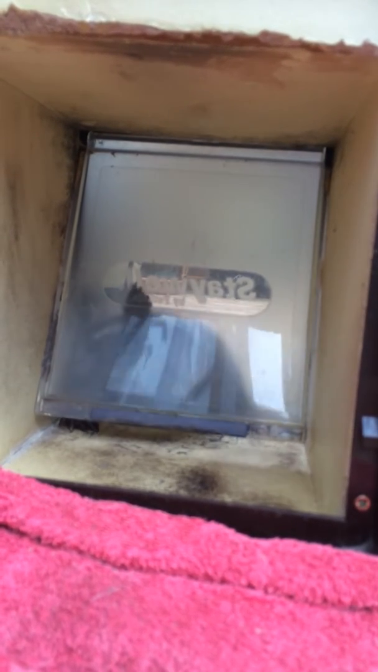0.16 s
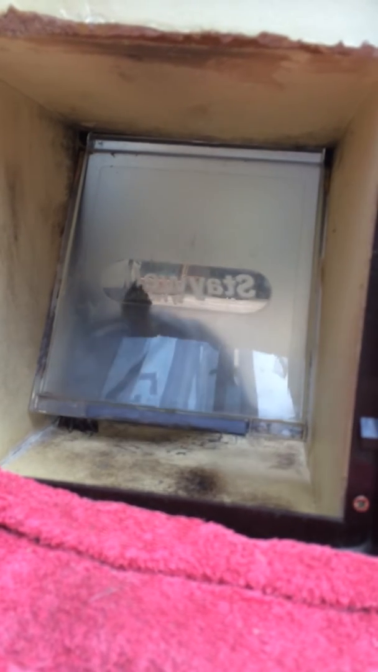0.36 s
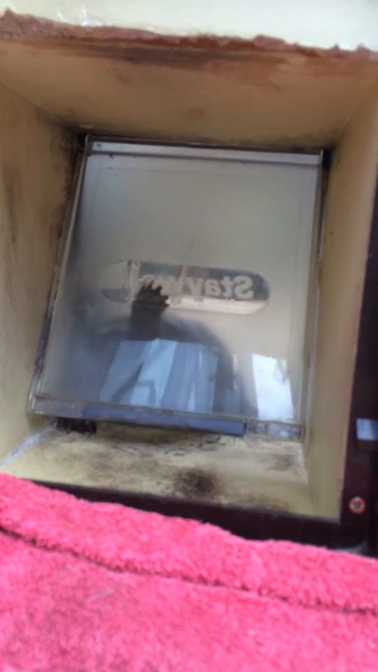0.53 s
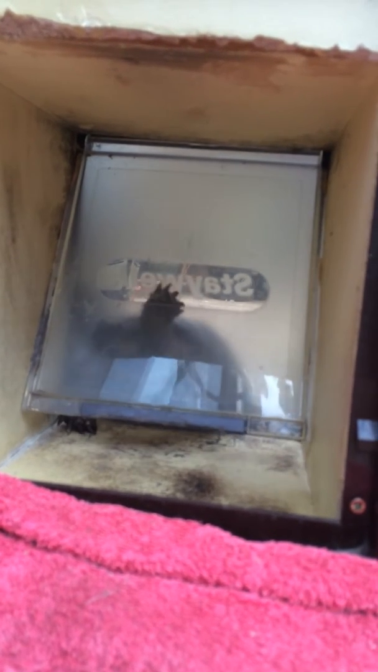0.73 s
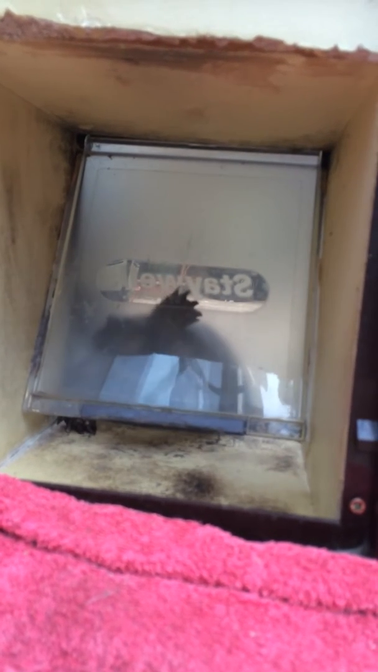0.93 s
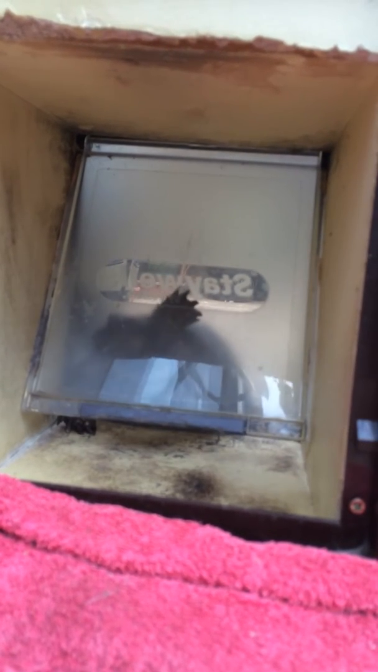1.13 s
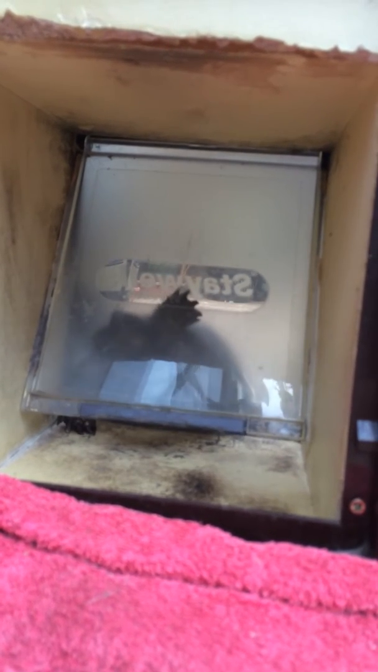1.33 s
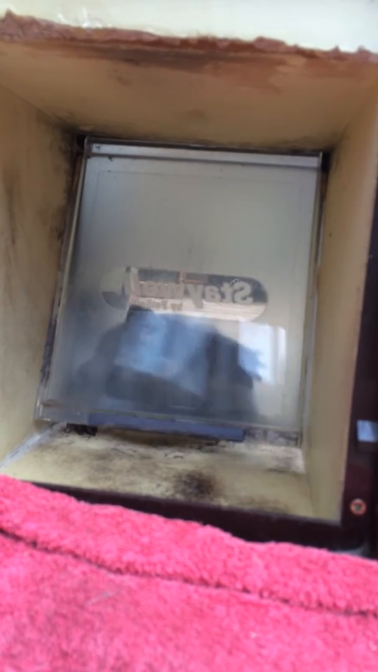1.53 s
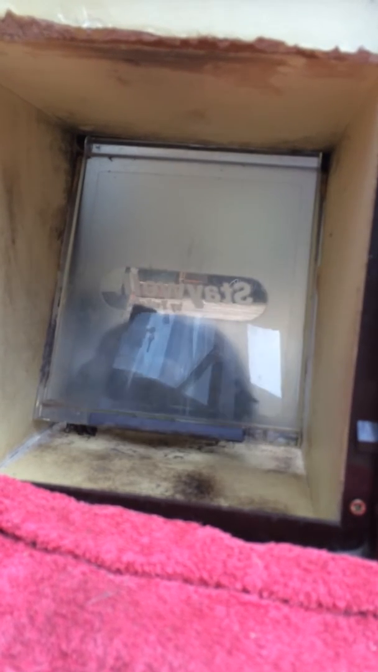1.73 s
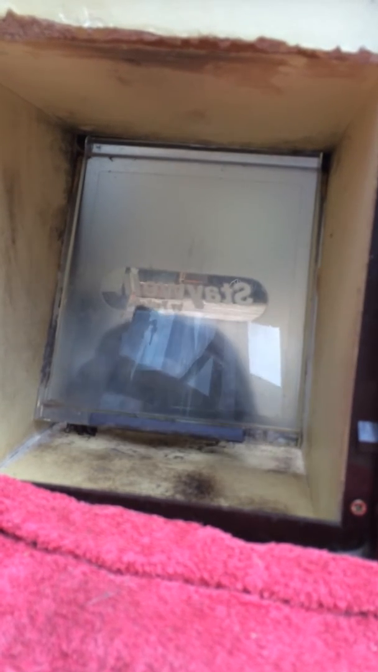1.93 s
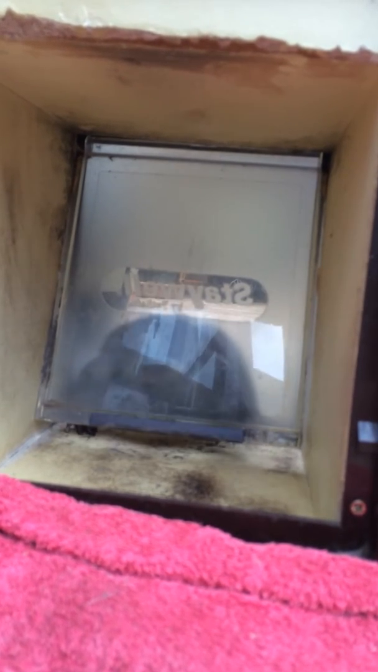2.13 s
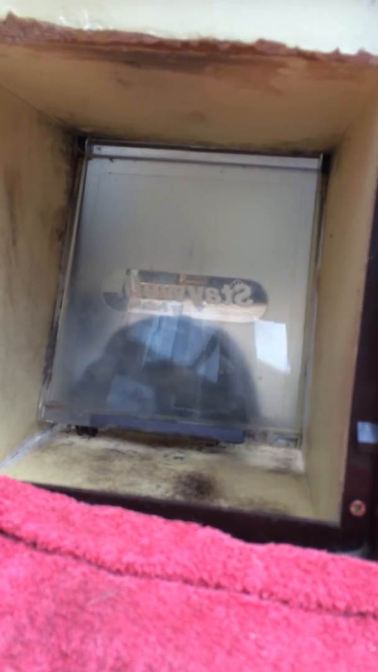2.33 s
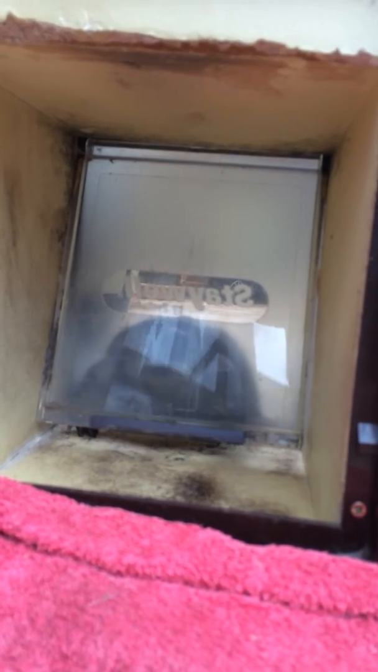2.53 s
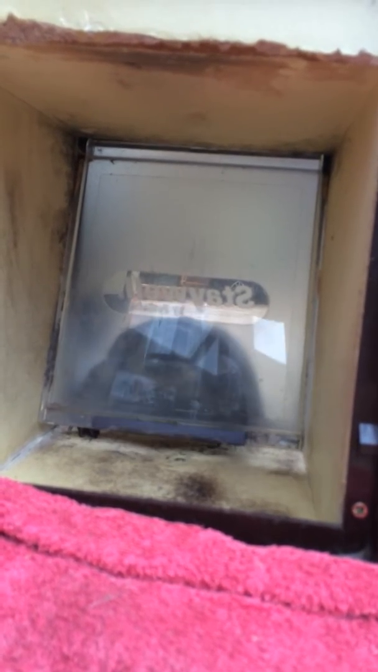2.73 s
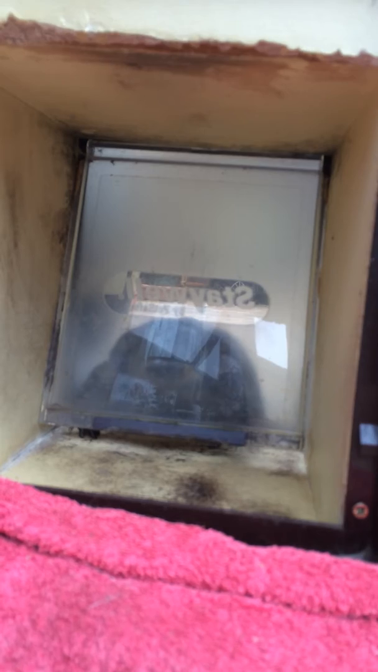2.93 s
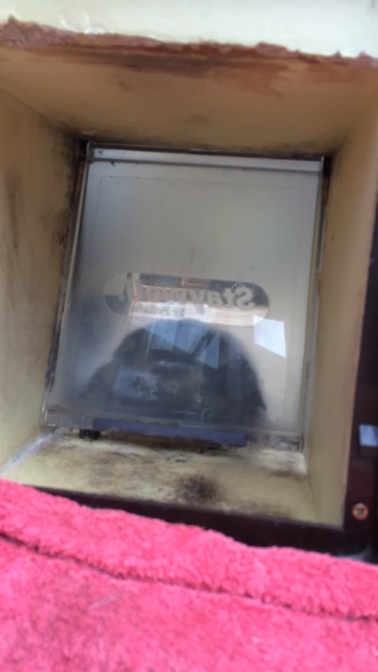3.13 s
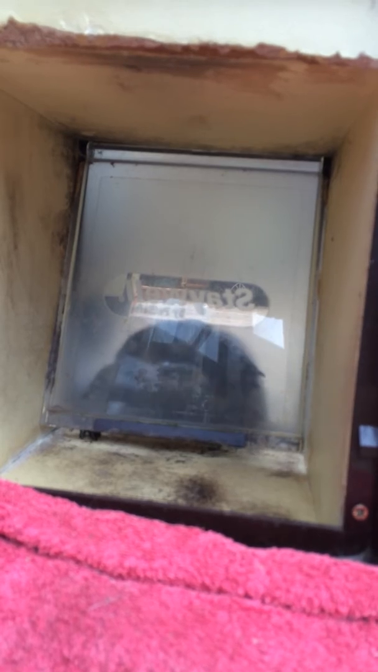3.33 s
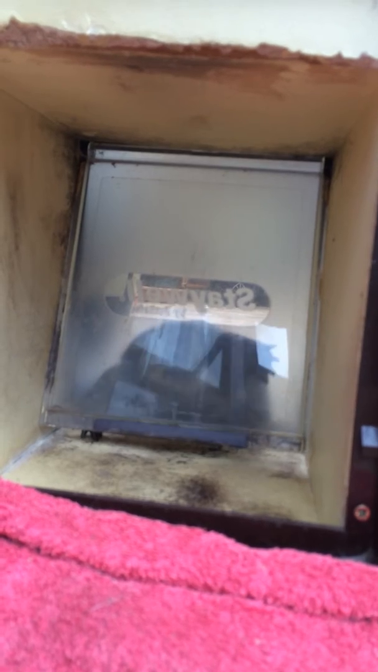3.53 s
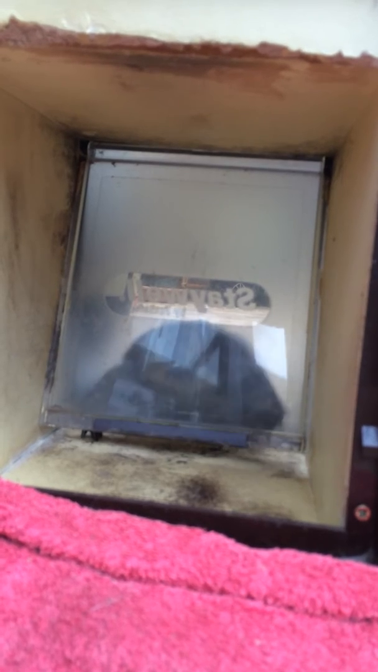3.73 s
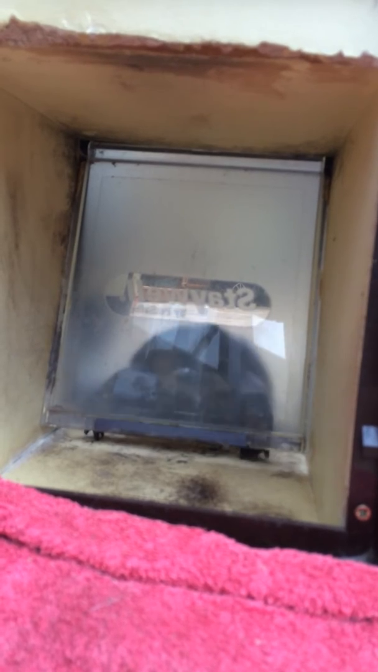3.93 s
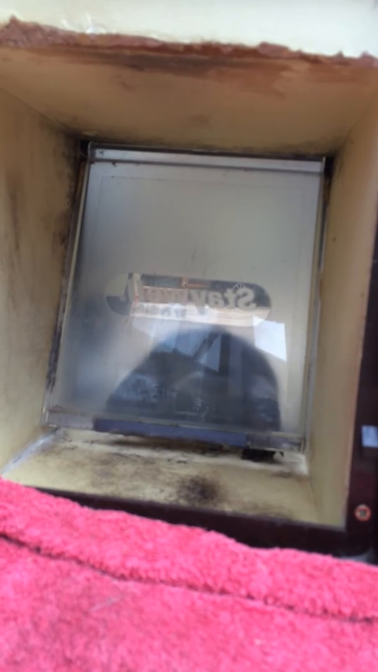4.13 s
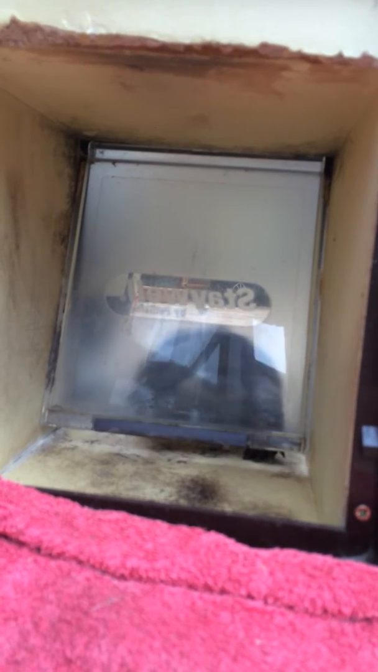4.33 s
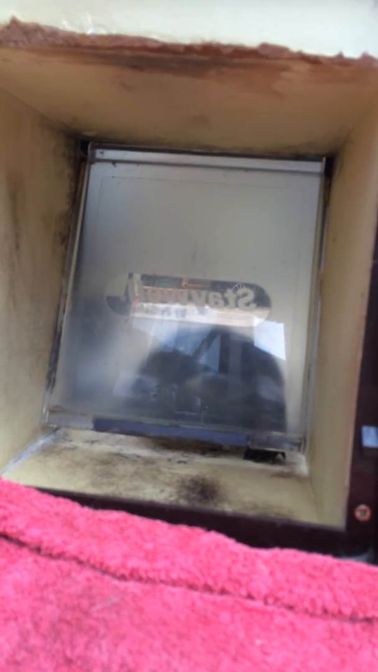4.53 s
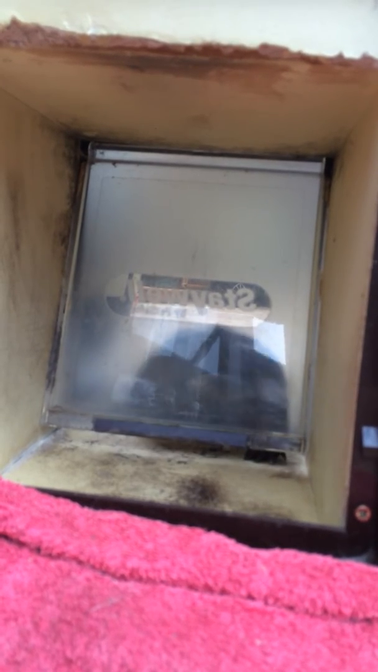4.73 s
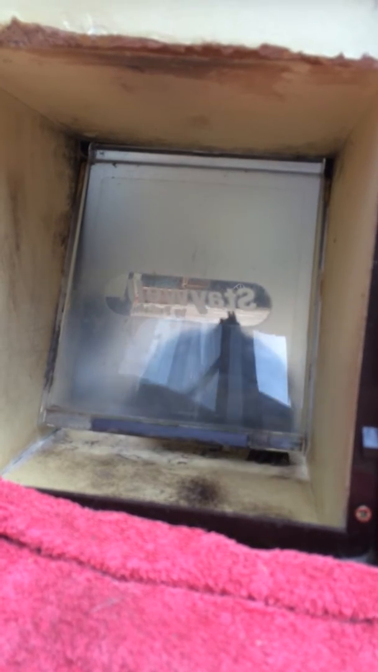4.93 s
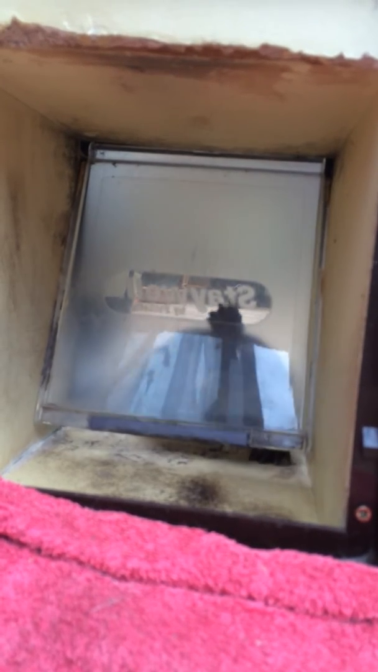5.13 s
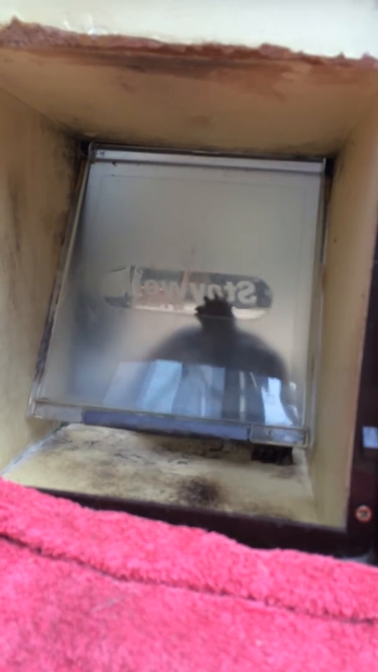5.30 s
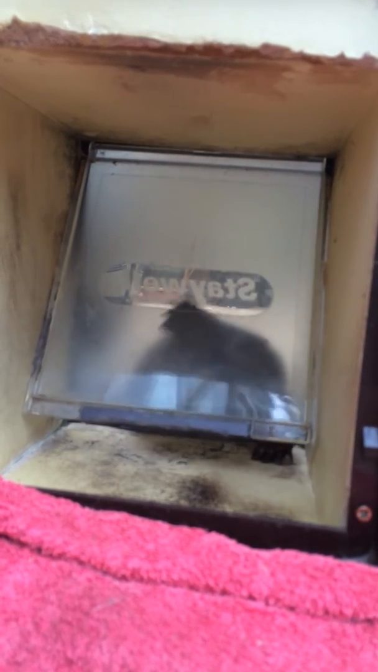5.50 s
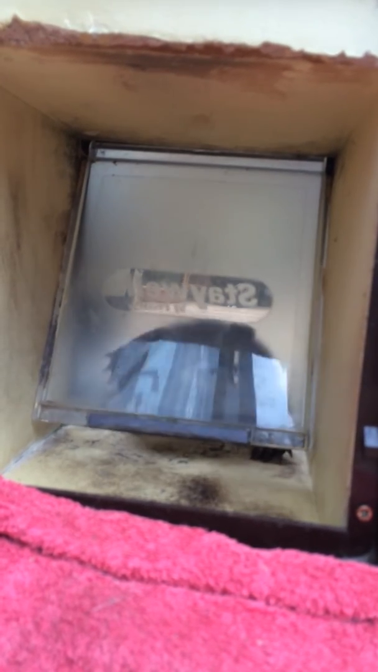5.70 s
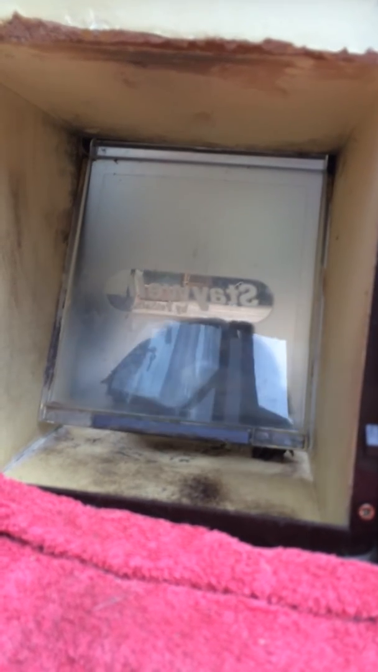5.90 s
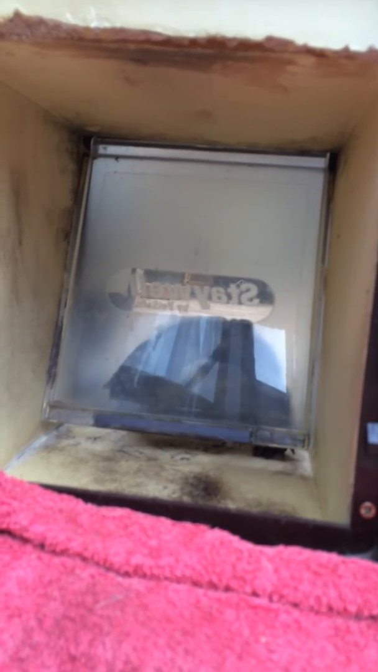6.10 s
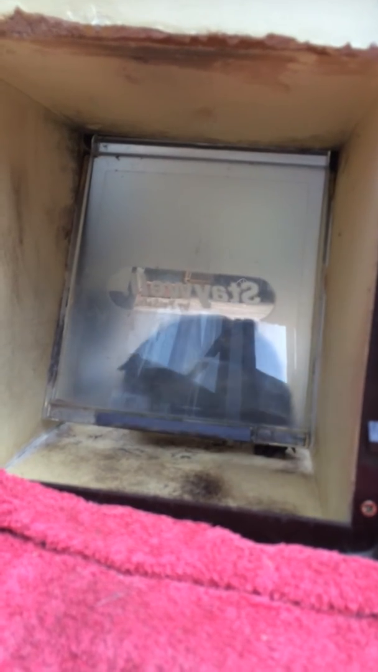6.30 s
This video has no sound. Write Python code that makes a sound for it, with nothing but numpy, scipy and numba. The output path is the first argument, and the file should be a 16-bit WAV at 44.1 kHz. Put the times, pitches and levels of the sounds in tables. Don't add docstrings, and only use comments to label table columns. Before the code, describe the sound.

A phone sits close to a plastic pet flap in a short wooden tunnel, in a quiet room with faint low hum. Soft bumps and low stirring open the first 0.3 s. At about 0.5 s a hard, tightly bunched clack strikes with a deep boxy boom and claw ticks, followed by knocks at 0.7 and 0.9. After a lull, a lift at 1.45 leads to a sharp knock at 1.6 with a brief claw scrape. From 2 to 3.5 it is subdued: dull padded bumps, faint scratching, soft fur rubbing, a tiny hinge squeak near 3.4. A medium knock lands at 3.8 with bright scrapes; light ticks and low flexing continue past 4.4. Knocks resume around 5.25-5.35, then the loudest rattling burst at 5.55-5.65, with clicks and scratches. Small squeaks and bumps fade to near quiet by 6.2, leaving a faint last scrape. Echo is short and boxy.

```python
import sys
import numpy as np
from scipy import signal
from scipy.fft import rfft, irfft
from scipy.io import wavfile
from scipy.ndimage import uniform_filter1d
from numba import njit

SR = 44100
rng = np.random.default_rng(int(sys.argv[2]) if len(sys.argv) > 2 else 0)


def volts_from_decibels(level):
    exponent = np.asarray(level, float) / 20
    return 10 ** exponent


def unload_audio(sound):
    columns = np.transpose(np.atleast_2d(sound))
    steps = np.round(np.clip(columns, -1, 1) * 32767)
    wavfile.write(sys.argv[1], SR, steps.astype(np.int16))


N = 284886


def add(out, t_s, x):
    i = int(t_s * SR)
    out[i:i + len(x)] += x[:N - i]


def unit(x):
    return x / np.sqrt(np.mean(x ** 2))


def fade(t60_s, length_s=.4):
    return volts_from_decibels(-60 * np.arange(int(length_s * SR)) / SR / t60_s)


def band(x, lo_hz, hi_hz):
    sos = signal.butter(2, [lo_hz, min(hi_hz, .45 * SR)], "bandpass", fs=SR, output="sos")
    return signal.sosfilt(sos, x)


def coloured(points):
    hz, db = np.transpose(points)
    log_hz = np.log(np.fft.rfftfreq(N, 1 / SR) + 1)
    gain = volts_from_decibels(np.interp(log_hz, np.log(hz), db))
    return unit(irfft(rfft(rng.standard_normal(N)) * gain, N))


def walk(rate_hz):
    k = int(SR / rate_hz)
    held = np.repeat(rng.standard_normal(N // k + 1), k)
    return unit(uniform_filter1d(held, k)[:N])


@njit
def svf(x, hz, damp):
    y, b, l = np.empty(len(x)), 0., 0.
    for i in range(len(x)):
        g = np.tan(np.pi * hz[i] / SR)
        v = (b + g * (x[i] - l)) / (1 + g * (g + damp))
        b, l, y[i] = 2 * v - b, l + 2 * g * v, damp * v
    return y


def ring(modes, tilt_db, scatter_db, detune):
    t = np.arange(int(.4 * SR)) / SR
    x = np.zeros(len(t))
    for hz, db, t60_s in modes:
        level_luck, pitch_luck = rng.standard_normal(2)
        tilted_db = db + tilt_db * np.log2(hz / modes[3][0])
        sine = np.sin(2 * np.pi * hz * (1 + detune * pitch_luck) * t)
        x += volts_from_decibels(tilted_db + scatter_db * level_luck) * fade(t60_s) * sine
    return x / np.abs(x).max()


def tick(centre_hz, t60_s):
    env = fade(t60_s, .05)
    x = band(rng.standard_normal(len(env)) * env, centre_hz / 1.71, centre_hz * 1.75)
    return x / np.abs(x).max()


# frequency in Hz, density in dB per Hz.
ROOM_SPECTRUM = [(15, -47.5), (25, -3.5), (85, -2), (102, -8), (145, -5), (311, -19), (356, -24.5),
                 (780, -18.5), (1490, -27), (2310, -32.5), (2570, -44.5), (3190, -44.5), (8690, -50.5),
                 (14500, -45), (16200, -60)]


def room():
    return volts_from_decibels(-56.5) * band(coloured(ROOM_SPECTRUM), 60, 19000)


def shake():
    out = np.zeros(N)
    for t_s, _, boom_db, *_ in [*KNOCKS, *LIFTS]:
        add(out, t_s, volts_from_decibels(boom_db - 23) * fade(.3))
    return out


# time in seconds, level in dB, tightness in dB.
LEAN = [(0, -41, 3), (.21, -44.5, -2), (.38, -53, 0), (.95, -59, -5.5), (1.26, -53, -1.5),
        (1.94, -57.5, -1.5), (2.23, -52.5, 3.5), (2.95, -68, -3), (3.26, -53, 4), (3.5, -57.5, -3),
        (3.81, -53, 4), (4.06, -42.5, 5.5), (4.22, -54, 7), (4.6, -57.5, -2.5), (5.04, -43.5, 1),
        (5.5, -56, -1), (5.8, -50, 8.5), (6.05, -58, -3)]


def leaning(rattle):
    s, lean_db, tight_db = np.transpose(LEAN)
    now = np.arange(N) / SR
    lean, tight = volts_from_decibels(np.interp(now, s, lean_db)), volts_from_decibels(np.interp(now, s, tight_db))
    nudges = rng.standard_normal(N) * volts_from_decibels(2.94 * walk(25))
    stir = signal.fftconvolve(nudges, ring(BOOM_MODES, .26, scatter_db=2, detune=0))[:N]
    deep, sway, flex = (unit(band(band(stir, lo, hi), lo, hi))
                        for lo, hi in [(45, 145), (145, 220), (240, 375)])
    out = (lean / tight * volts_from_decibels(-6.5) + rattle * volts_from_decibels(-5)) * deep
    out += (lean * volts_from_decibels(-7.5) + rattle * volts_from_decibels(-3.5)) * sway
    out += (lean * tight * volts_from_decibels(-16.5) + rattle * volts_from_decibels(-14)) * flex
    return out


# frequency in Hz, density in dB per Hz.
FUR_SPECTRUM = [(880, -4), (1500, -37), (2320, 3), (3000, 0), (3620, -1.5), (5440, -1.5), (9750, -7),
                (14800, -12.5), (16000, -30)]
# time in seconds, level in dB.
RUBBING = [(0, -64), (.21, -64), (.9, -66.5), (1.3, -75), (1.56, -55.5), (1.8, -69), (2.23, -63),
           (2.9, -67.5), (3.33, -55.5), (3.6, -60), (4.06, -57), (4.33, -65), (4.62, -58.5), (4.95, -57),
           (5.17, -62.5), (5.5, -55.5), (5.87, -59), (5.93, -67)]


def rubbing(rattle):
    rub = volts_from_decibels(np.interp(np.arange(N) / SR, *np.transpose(RUBBING)))
    paws = band(rng.standard_normal(N), 765, 1770) * volts_from_decibels(.71 * walk(25))
    hiss = coloured(FUR_SPECTRUM) * volts_from_decibels(1.9 * walk(40))
    fur = np.zeros(N)
    for hz in 1500 * 2 ** np.arange(0, 3.4, .125):
        fur += band(hiss, hz, hz * 2 ** .125) * volts_from_decibels(1.1 * walk(14))
    out = (rub * volts_from_decibels(-10) + rattle * volts_from_decibels(-34.5)) * unit(paws)
    return out + (rub * volts_from_decibels(-10) + rattle * volts_from_decibels(-35.5)) * unit(fur)


def drag(length_s, db, from_hz, to_hz, rise):
    u = np.linspace(0, 1, int(length_s * SR))
    effort = np.minimum(u / rise, ((1 - u) / (1 - rise)) ** .5)
    grains = rng.standard_normal(len(u)) * volts_from_decibels(1.04 * rng.exponential(size=len(u)))
    grains *= volts_from_decibels(3.2 * unit(uniform_filter1d(rng.standard_normal(len(u)), size=96)))
    hz = from_hz * (to_hz / from_hz) ** u
    streaks = np.zeros(len(u))
    for ratio in 2 ** rng.uniform(-.6, .7, size=5):
        streaks += unit(svf(grains, np.minimum(hz * ratio, .4 * SR), .06))
    body = unit(svf(svf(grains, hz, 1.2), hz, 1.7))
    return volts_from_decibels(db) * effort * (body + volts_from_decibels(-10) * streaks)


# time in seconds, peak in dB, pitch in Hz.
TICKS = [(1.52, -27, 6200), (1.6814, -46, 6000), (1.9923, -52.5, 6360), (3.8515, -43, 6000),
         (3.935, -45, 4300), (4.026, -48, 3010), (0.5185, -28, 5200), (0.839, -47, 5000),
         (4.376, -39, 5200), (4.56, -54, 3970), (4.7147, -49.5, 3400), (4.9708, -49, 5370),
         (5.088, -49, 6200), (5.4714, -49, 5660), (5.578, -24, 7150), (5.614, -41, 4700)]
# start in seconds, length in seconds, level in dB, pitch in Hz.
RASPS = [(0.06, .014, -64, 5500), (0.189, 0.012, -60, 1270), (0.479, 0.0074, -39, 5100),
         (0.501, 0.0059, -38.5, 3270), (0.516, 0.021, -38, 5030), (0.68, 0.021, -58, 3000),
         (0.701, 0.02, -48, 3740), (0.723, 0.0067, -42.5, 3500), (0.862, 0.022, -55, 6560),
         (0.868, 0.011, -44, 4160), (3.934, 0.012, -60, 3670), (5.070, 0.0052, -68, 5900),
         (5.325, 0.018, -50, 3900), (5.525, 0.023, -36, 4840), (5.622, 0.017, -51, 6400)]
# start in seconds, length in seconds, level in dB, pitch in Hz.
SLIDES = [(1.021, 0.36, -75.5, 3520), (1.517, 0.07, -49, 6650), (1.568, 0.051, -46, 6520),
          (1.679, 0.13, -69, 6650), (2.4, .09, -75, 7500), (2.6, .09, -72, 1900), (2.797, 0.097, -72, 4900),
          (3.268, 0.11, -68.5, 8100), (3.381, .22, -69.5, 4800), (4.452, 0.04, -50, 4300),
          (4.483, 0.061, -61.5, 5030), (4.555, 0.037, -61.5, 3770), (4.958, 0.037, -65.5, 4600),
          (5.557, 0.05, -41, 3970), (5.578, 0.034, -39.5, 6200), (5.638, 0.049, -42, 6500),
          (5.688, 0.063, -66.5, 5230), (5.755, 0.079, -64, 6360)]
# start in seconds, length in seconds, level in dB, start pitch in Hz, end pitch in Hz.
DIGS = [
    (2.093, 0.1, -60, 680, 900),
    (2.101, 0.088, -64.5, 2900, 2900),
    (3.687, 0.097, -53, 4600, 6900),
    (3.742, 0.065, -49, 8100, 5700),
    (4.378, 0.092, -52, 6400, 5900),
    (5.43, .1, -66.5, 5400, 7000),
    (4.784, 0.042, -58.5, 4300, 3200),
    (5.798, 0.1, -73, 5000, 6500),
    (6.33, 0.15, -62.5, 8200, 8700),
    (6.2, 0.3, -69.5, 3200, 3430),
]


def claws():
    out = np.zeros(N)
    for t_s, db, hz in TICKS:
        add(out, t_s, volts_from_decibels(db + 1) * tick(hz, t60_s=.016))
    for t_s, length_s, db, hz in RASPS:
        add(out, t_s, drag(length_s, db, hz, hz * .915, rise=.39))
    for t_s, length_s, db, hz in SLIDES:
        add(out, t_s, drag(length_s, db, hz, hz * .84, rise=.2))
    for t_s, length_s, db, from_hz, to_hz in DIGS:
        add(out, t_s, drag(length_s, db, from_hz, to_hz, rise=.65))
    return out


# frequency in Hz, level in dB, t60 in seconds.
BOOM_MODES = [(70.5, 1.5, 0.092), (104.1, -1.5, 0.21), (134.8, -7, 0.35), (184.9, -2.5, 0.17),
              (178, 12, 0.04), (241, -3.5, 0.11), (301.7, -6.5, 0.14), (333, -9, 0.17), (415, -29, 0.08),
              (464, -27, .06)]
# frequency in Hz, level in dB.
PANE_MODES = [(620, 0.5), (830, 3), (950, 5), (1150, -15), (1390, -3), (1680, -0.5), (2070, -2.5),
              (2400, -15.5), (2900, -17), (3670, -16), (4180, -11)]


def flap(blows, way, push_s):
    out = np.zeros(N)
    swing_s, squeeze_s = .0022, .006
    push = np.hanning(int(push_s * SR))
    push /= push.sum()
    squeeze = np.convolve(fade(.014, squeeze_s)[::-1], push)
    pane = [(hz, db, .022) for hz, db in PANE_MODES]
    for t_s, crack_db, boom_db, tick_db, tilt_db in blows:
        contact_s = t_s - swing_s
        boom = np.convolve(ring(BOOM_MODES, np.clip(tilt_db, -7, 6), scatter_db=1.5, detune=.012), push)
        crack = ring(pane, 0, scatter_db=6, detune=.013)
        add(out, contact_s - squeeze_s, way * volts_from_decibels(boom_db - 3) * squeeze)
        add(out, contact_s, -way * volts_from_decibels(boom_db + 2.5) * boom)
        add(out, contact_s, way * volts_from_decibels(crack_db - 1.5) * crack)
        add(out, contact_s, volts_from_decibels(crack_db - 9) * tick(1220, t60_s=.052))
        add(out, contact_s, volts_from_decibels(tick_db - 11.5) * tick(4760, t60_s=.03))
    return out


# deepest swing in seconds, crack in dB, boom in dB,
# tick in dB, boom brightness in dB per octave.
KNOCKS = [(0.0758, -41, -31, -34, -0.5), (0.4858, -14, -7.5, -9.5, -1), (0.4926, -27, -14.5, -31, 2),
          (0.498, -18, -14.5, -43, -3), (0.5402, -21.5, -11, -16, 4.5), (0.7106, -20.5, -11, -12.5, 6),
          (0.7168, -31, -24.5, -47, 5), (0.7227, -24, -28, -37, -6), (0.8757, -22, -11.5, -22, 2),
          (1.577, -17, -12.5, -14.5, 7), (3.1559, -35, -26.5, -43, 4.5), (3.5526, -40.5, -31, -64, 6),
          (3.7925, -24, -17, -19, 0.5), (5.0919, -47.5, -33, -37.5, -2), (5.2541, -35, -21, -38.5, -3),
          (5.334, -31.5, -32, -40, 0), (5.3419, -27, -28.5, -16.5, -2), (5.351, -25.5, -14, -14, -2.5),
          (5.5504, -13.5, -5.5, -8, 6), (5.565, -21, -11, -12, 9), (5.5911, -25, -13.5, -22, 8),
          (5.621, -45, -23, -18, -8), (5.6547, -46, -37, -18.5, 8)]
# time in seconds, crack in dB, boom in dB, tick in dB.
LIFTS = [(0.0858, -60, -35, -59), (0.169, -43, -34, -55), (0.4737, -27, -17.5, -32),
         (0.6859, -33, -30, -34), (0.841, -50, -33.5, -41), (0.862, -49, -37, -33),
         (1.451, -27, -19.5, -36), (1.5225, -40, -45, -45), (5.5306, -21.5, -14, -35),
         (5.5859, -28, -24, -38), (5.8599, -47, -36.5, -59)]


def hard_blows():
    lifts = [(*row, 6) for row in LIFTS]
    return flap(KNOCKS, 1, push_s=.0024) + flap(lifts, -1, push_s=.0024)


def padded(t_s, boom_db, tilt_db):
    return t_s, boom_db - 21, boom_db, boom_db - 18, tilt_db


# time in seconds, boom in dB, brightness in dB per octave.
BUMPS = [(0.1992, -33, 7), (0.2199, -36, 6), (0.5465, -21, -11), (1.5883, -35, -4), (1.9972, -45, 2),
         (2.3038, -35.5, 2), (2.6445, -41, -10), (2.7763, -38.5, 4), (3.1699, -30, -11), (3.4757, -38.5, 3),
         (3.4866, -32.5, -2), (3.8037, -21, 5), (4.3775, -39.5, 7), (5.363, -31, -14), (5.9799, -46, 5)]
# time in seconds, boom in dB.
EASES = [(0.234, -45), (0.7363, -24), (0.9, -33), (1.489, -28.5), (1.53, -24), (1.596, -26), (1.612, -27),
         (4.643, -43), (4.9837, -30.5), (5.1018, -41.5), (5.386, -35), (5.636, -28), (5.9062, -37.5),
         (6.1715, -45)]


def soft_blows():
    bumps = [padded(*row) for row in BUMPS]
    eases = [padded(*row, -6) for row in EASES]
    return flap(bumps, 1, push_s=.0032) + flap(eases, -1, push_s=.006)


# start in seconds, length in seconds, level in dB, pitch in Hz.
SQUEAKS = [(3.375, .04, -63, 1810), (3.40, .155, -63, 1770), (3.340, .20, -71, 3500),
           (5.665, .03, -59, 2200), (5.720, .11, -66, 3480), (5.84, .08, -74, 3480),
           (3.745, .02, -54, 6150), (.520, .015, -46, 2070), (3.960, .12, -71, 2050),
           (4.105, .05, -71, 3000), (5.775, .025, -61, 5800), (3.200, .02, -66, 1750)]


def hinge():
    out = np.zeros(N)
    for t_s, length_s, db, hz in SQUEAKS:
        n = int(length_s * SR)
        pitch_hz = hz * (1 + .008 * walk(60)[:n]) * np.linspace(1.004, .996, n)
        note = np.sin(2 * np.pi * np.cumsum(pitch_hz) / SR) * volts_from_decibels(2.5 * walk(90)[:n])
        haze = unit(svf(rng.standard_normal(n), pitch_hz, .075))
        add(out, t_s, volts_from_decibels(db) * signal.windows.tukey(n, .3) * (note + .7 * haze))
    return out


def echo(x):
    tail = band(rng.standard_normal(int(.4 * SR)), 120, 5550) * fade(.14)
    tail *= volts_from_decibels(-15.5) / np.sqrt(np.sum(tail ** 2))
    return signal.fftconvolve(x, tail)[:N]


def scene():
    door = claws() + hard_blows() + soft_blows() + hinge()
    rattle = shake()
    return (room() + leaning(rattle) + rubbing(rattle) + door + echo(door))[None]


def top_cut(x):
    return signal.sosfilt(signal.butter(12, 16360, fs=SR, output="sos"), x)


def record(dry):
    x = signal.sosfilt(signal.butter(2, 50, "highpass", fs=SR, output="sos"), dry)
    x = x + volts_from_decibels(-89) * unit(band(rng.standard_normal(N), 14780, 15020))
    x = signal.sosfilt(signal.ellip(8, .2, 70, 15600, fs=SR, output="sos"), x)
    return top_cut(x)


dry = scene()
out = record(dry)
unload_audio(out)
```